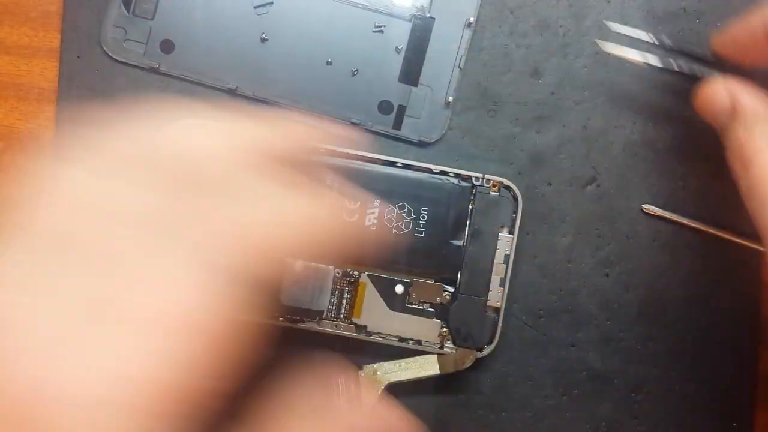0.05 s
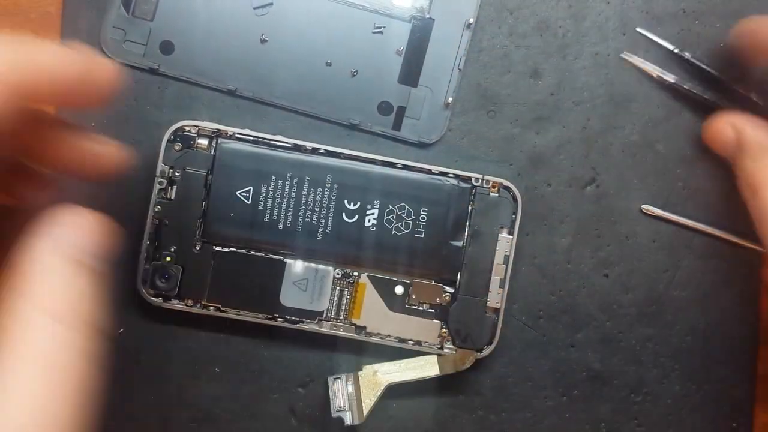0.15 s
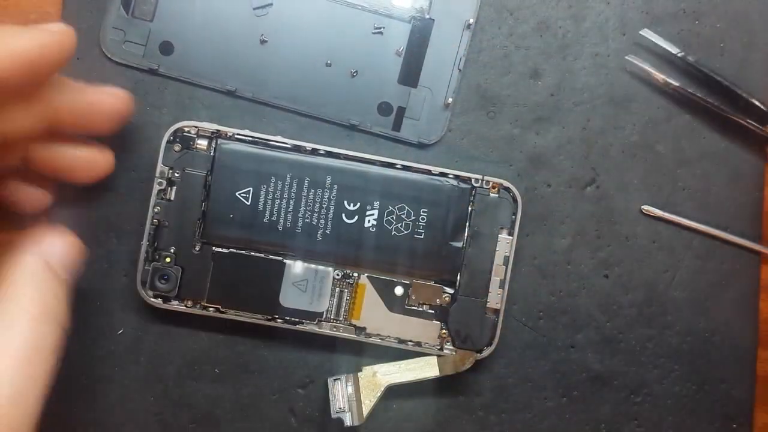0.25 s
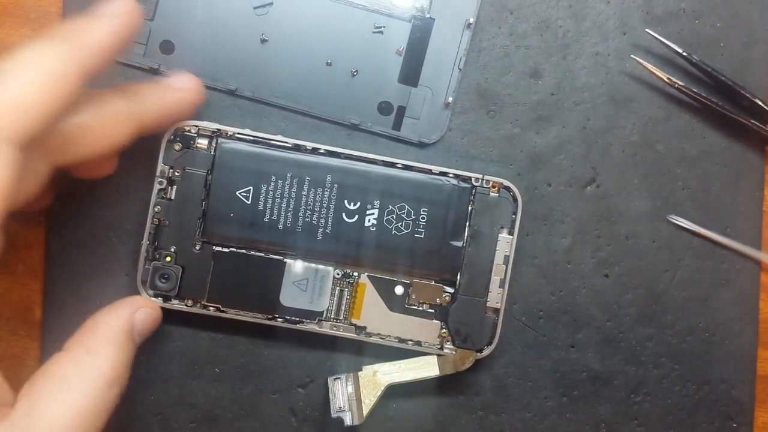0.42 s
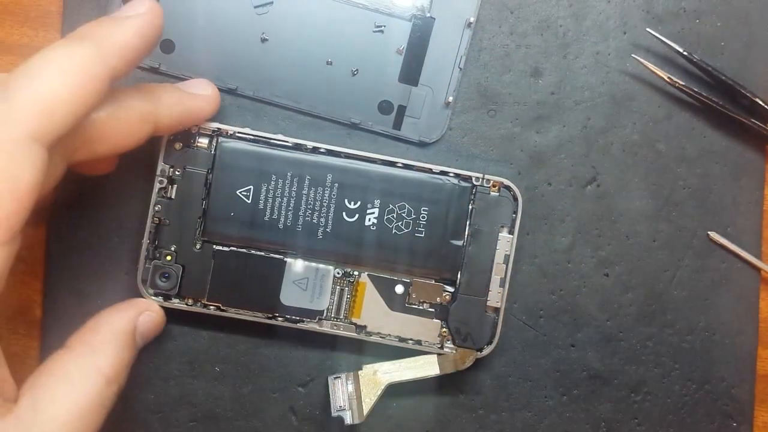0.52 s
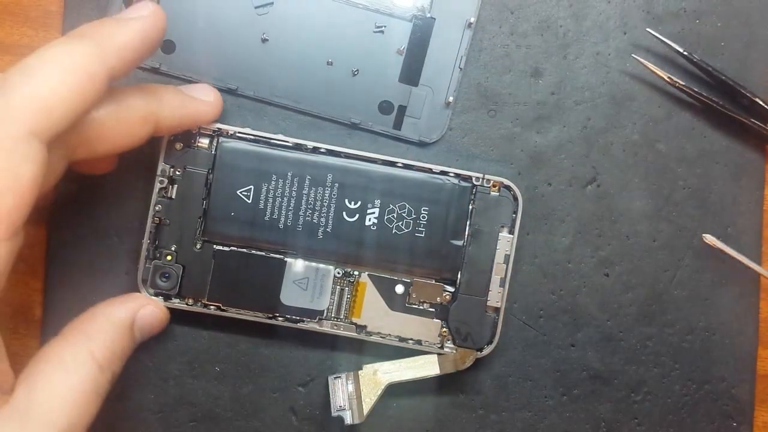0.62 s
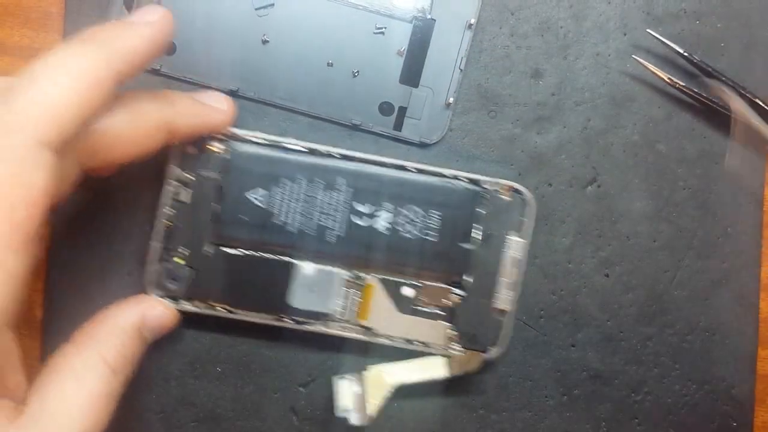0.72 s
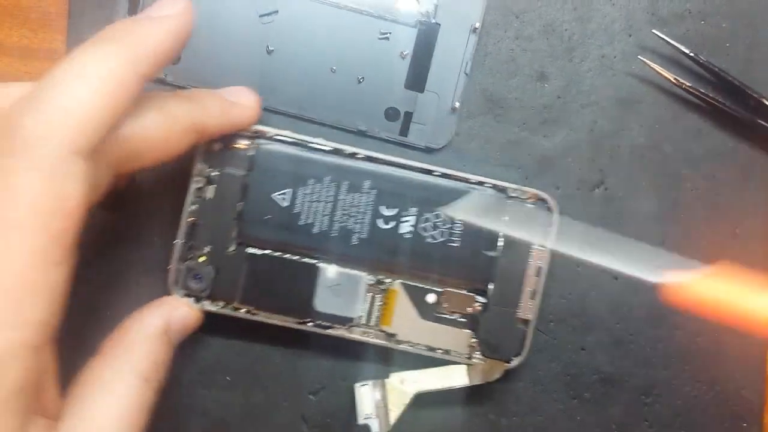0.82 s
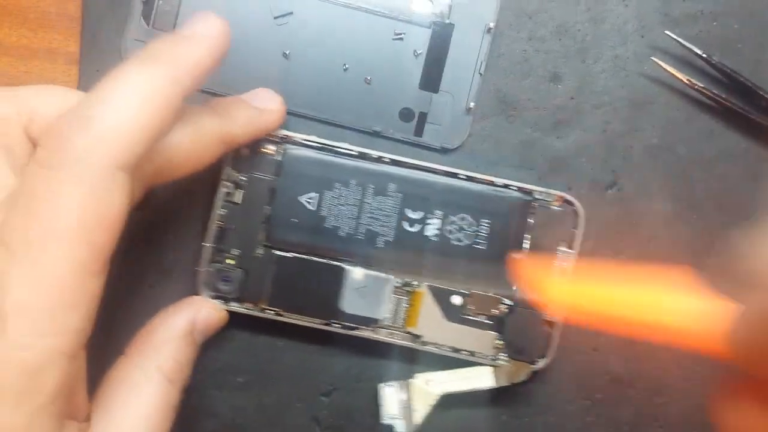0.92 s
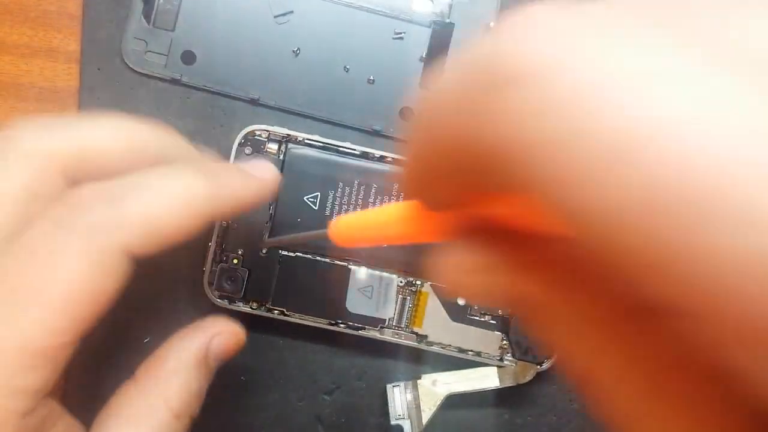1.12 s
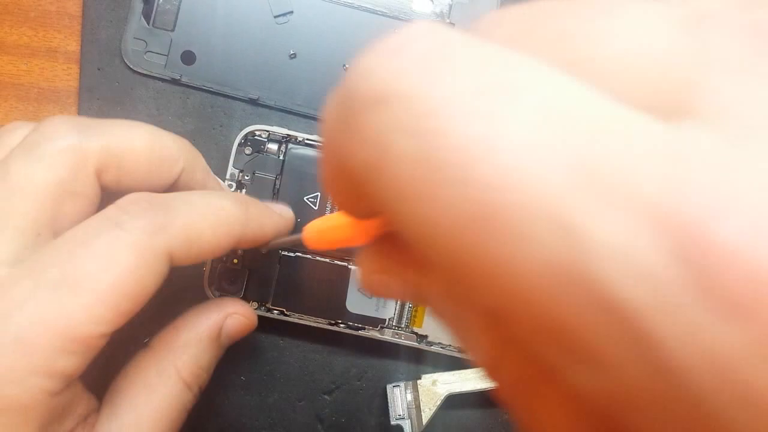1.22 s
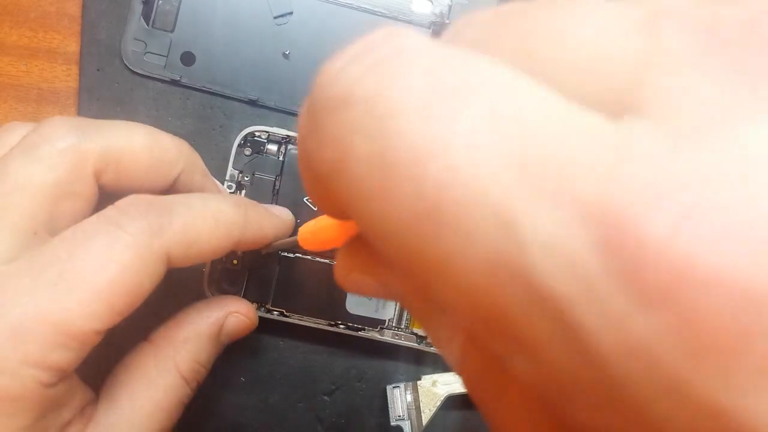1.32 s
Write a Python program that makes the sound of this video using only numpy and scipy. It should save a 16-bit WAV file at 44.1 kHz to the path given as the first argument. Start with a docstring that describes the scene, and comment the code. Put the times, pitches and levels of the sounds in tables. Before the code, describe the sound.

Bright, loud clink of steel tweezers landing on a bench, rattling in ever faster bounces, then soft rustling

```python
"""Steel tweezers drop onto a workbench mat, close to a two-port recorder, and bounce to rest.
Each contact is a set of short modes plus a noise crack; two long leg modes ring between bounces.
A hand moves softly on the bench before, during and after the drop, as swells of noise; a nail
ticks twice on a tool after it, as short modes. Room noise and hum lie underneath, decaying noise
gives the echoes of bench and walls, and the loud clink makes the recorder turn its gain down."""
import sys
import numpy as np
from scipy import signal
from scipy.fft import rfft, irfft
from scipy.io import wavfile

SR = 44100
rng = np.random.default_rng(int(sys.argv[2]) if len(sys.argv) > 2 else 0)


def store_wav(level_fs):
    """Save 16-bit WAV to argv[1]."""
    pcm = np.round(np.clip(np.atleast_2d(level_fs), -1, 1) * 32767)
    wavfile.write(sys.argv[1], SR, pcm.T.astype(np.int16))


N = 59535

# Tweezers meeting the mat; each ring strength holds from its bounce to the next:
# start_s, knock_db, treble_db (on top of the knock), low_ring_db, high_ring_db
BOUNCES = [(0.2465, 8, 3, -40, -12.5), (0.279, -16, 0, -17, -18.5), (0.3219, 2.5, 2.5, -5, -27.5),
           (0.379, 0.5, 1, -22, -24.5), (0.4323, -1.5, -1, -10, -28), (0.4734, -4, 1.5, -12.5, -40.5),
           (0.5061, -8.5, 6, -14, -36), (0.525, -15, 9.5, -16.5, -34), (0.538, -15.5, 1, -18.5, -36),
           (0.547, -23, 7, -18, -37), (0.553, -18, -2, -22.5, -35.5), (0.572, -22.5, 6.5, -22, -38.5),
           (0.598, -33.5, 3.5, -28, -44)]
# Nail on tool: start_s, level_db, treble_db (on top of the level)
TICKS = [(0.799, -14, 0), (.8462, -27, -9)]
TREBLE_HZ = 5200  # the treble_db columns act above this


def amp(db):
    """Decibels to amplitude."""
    return 10 ** (np.asarray(db, float) / 20)


def rms_one(x):
    """Scale to an RMS of 1."""
    return x / np.sqrt(np.mean(x ** 2) + 1e-20)


def at_hz(points, hz):
    """Read a curve of (Hz, value) points, straight over log frequency."""
    points = np.array(points)
    return np.interp(np.log(hz), np.log(points[:, 0]), points[:, 1])


def smooth(x, seconds):
    """One-pole lag."""
    r = np.exp(-1 / (max(seconds, 1e-4) * SR))
    return signal.lfilter([1 - r], [1, -r], x)


def drift(seconds):
    """Slow random wander with an RMS of 1."""
    noise = rng.standard_normal(N + SR)  # the first second lets the lags settle
    return rms_one(smooth(smooth(noise, seconds), seconds)[SR:])


def clicks(s, gain):
    """Single-sample clicks at the given seconds."""
    out = np.zeros(N)
    out[(np.asarray(s) * SR).astype(int)] = gain
    return out + 1e-18


def ring(x, hz, t60):
    """A unit click sets a decaying sine ringing, of height 1 at its start."""
    r, w = amp(-60 / (t60 * SR)), 2 * np.pi * hz / SR
    return signal.lfilter([0, np.sin(w)], [1, -2 * r * np.cos(w), r * r], x)


def coloured(x, spectrum):
    """Weight a sound by a spectrum of (Hz, dB) points."""
    hz = np.maximum(np.fft.rfftfreq(N, 1 / SR), 1)
    return irfft(rfft(x) * amp(at_hz(spectrum, hz)), N)


def cut(x, hz, kind):
    """Second-order Butterworth filter."""
    return signal.sosfilt(signal.butter(2, hz, kind, fs=SR, output="sos"), x)


def pair(alike):
    """Two white noises sharing the given part of their power."""
    both, *own = rng.standard_normal((3, N))
    alike = np.clip(alike, 0, 1)
    return np.sqrt(alike) * both + np.sqrt(1 - alike) * np.array(own)


def room_noise():
    """Broad hiss and rumble from the left, most alike at both ports in the bass, plus wavering hum tones."""
    # Broad noise density: hz, level_db (shape only)
    noise_spectrum = [(15, -56.5), (35, -23), (86, -9), (143, -6), (214, -15), (259, -9), (520, -16),
                      (890, -12), (1330, -16), (5990, -26), (12400, -50), (15300, -66.5)]
    # Hum held by the room, as noise-driven resonances: hz, width_hz (t60 = 1.8 / width), level_db
    hum_tones = [(104, 20, -53), (133.7, 20, -43.5), (255.7, 16, -50), (281.6, 8.6, -54)]
    # Likeness of the two ports: hz, correlation
    likeness = [(30, .8), (70, 1), (250, 1), (600, .6), (1600, 0.36), (5000, 0.17), (14000, 0.074)]
    noise_db, pan_db, left_leads_s = -36.5, 2.5, 0.00028
    alike = [(hz, np.clip(c, 0, 0.99)) for hz, c in likeness]
    mid, side = rng.standard_normal((2, N))
    mid = coloured(mid, [(hz, 10 * np.log10(1 + c)) for hz, c in alike])
    side = coloured(side, [(hz, 10 * np.log10(1 - c)) for hz, c in alike])
    broad = rms_one(np.array([coloured(x, noise_spectrum) for x in (mid + side, mid - side)]))
    hum = 0
    for hz, width, level_db in hum_tones:
        tone = ring(rng.standard_normal(N + SR), hz, 1.8 / width)[SR:]
        hum = hum + amp(level_db) * rms_one(tone)
    left, right = amp(noise_db) * broad + cut(hum, 49, "high")
    right = np.roll(right, round(left_leads_s * SR))
    return np.array([left * amp(pan_db / 2), right * amp(-pan_db / 2)])


def swells(rows, low_hz, high_hz, alike):
    """Soft bell-shaped swells of noise in one band."""
    t = np.arange(N) / SR
    swell = sum(amp(db) * np.exp(-((t - s) / half) ** 2) for s, half, db in rows)
    return swell * rms_one(cut(pair(alike), [low_hz, high_hz], "band"))


def hand():
    """A hand moving on the bench: low rumbles nearly alike at both ports, and high rustles mostly not."""
    # Rumbles: peak_s, half_width_s (to 1/e), level_db
    rumbles = [(.15, 0.076, -45), (.275, 0.036, -30.5), (1.267, 0.0083, -34.5), (1.32, 0.082, -35)]
    # Rustles: peak_s, half_width_s (to 1/e), level_db
    rustles = [(.215, 0.005, -47), (0.866, 0.068, -49.5), (0.98, 0.038, -46.5), (1.30, 0.054, -52)]
    low = swells(rumbles, 89.5, 463, alike=0.8)
    high = swells(rustles, 3493, 8700, alike=0.17)
    return low + high


def knock_modes():
    """Short modes of tweezers and bench, swelling then dying; bending waves bring many low ones later."""
    # Modes: hz, level_db (relative), strongest_after_s, t60_s
    modes = [(3397, 3.5, 0.000068, 0.0025), (885, -13.5, 0.00082, 0.009), (513, -23.5, 0.0031, 0.0072),
             (716, -23.5, 0.0046, 0.004), (1117, -18, 0.005, 0.014), (1402, -19, 0.0057, .007),
             (1700, -28.5, 0.0016, 0.0043), (1997, -20.5, 0.003, 0.0063), (2306, -5.5, 0.0033, 0.016),
             (2399, -9.5, 0.0037, 0.015), (3295, -5, 0.00089, 0.012), (3523, -4, 0.0021, .012),
             (4104, -6, 0.0016, 0.012), (4915, -6, 0.0017, 0.025), (5946, -10, 0.0016, 0.034),
             (6333, -11, 0.00051, 0.031), (7780, -14.5, 0.00039, .003)]
    modes_db, strike_spread_db = -2, 0.9
    right_leads_s = 0.00013
    air_from_hz = 2800  # lower modes come through the bench and reach both ports together
    s, db, treble_db = np.transpose(BOUNCES)[:3]
    spread_db = rng.normal(0, strike_spread_db, (len(s), len(modes)))  # no two blows excite them alike
    t = np.arange(SR // 10) / SR
    out = 0
    for k, (hz, level_db, late, t60) in enumerate(modes):
        left_delay = right_leads_s * (hz > air_from_hz)
        since = np.maximum(t - np.array([[left_delay], [0]]), 0)
        rise = np.sin(np.pi / 2 * np.minimum(since / late, 1)) ** 2
        fall = amp(-60 * np.maximum(since - late, 0) / t60)
        mode = -rise * fall * np.sin(2 * np.pi * hz * since)
        strikes = clicks(s, amp(db + spread_db[:, k] + treble_db * (hz > TREBLE_HZ)))
        out = out + amp(modes_db + level_db) * signal.fftconvolve(strikes[None], mode, axes=1)[:, :N]
    return out


def crack(blows, blows_treble):
    """Loose parts shiver: every blow starts a burst of noise that dies exponentially."""
    # Crack noise density: hz, level_db (shape only)
    crack_spectrum = [(200, -26.5), (700, -6.5), (1500, -2), (2880, -4.5), (3930, 2.5), (6180, -5),
                      (7970, -12), (8890, -14), (12000, -41), (15300, -34)]
    crack_db, t60 = -7.5, 0.039
    noise = amp(crack_db) * rms_one(coloured(pair(alike=0.53), crack_spectrum))
    fall = [1, -amp(-60 / (t60 * SR))]
    low = cut(noise, TREBLE_HZ, "low") * signal.lfilter([1], fall, blows)
    high = cut(noise, TREBLE_HZ, "high") * signal.lfilter([1], fall, blows_treble)
    return low - high


def knocks():
    """Every contact excites short modes and a crack, brighter or duller; the legs clap after the first."""
    # Legs clapping together: start_s, peak_db, hz, t60_s
    leg_claps = [(.2650, 0.5, 4320, 0.011), (0.2706, -9, 4490, 0.064), (0.273, -3.5, 4340, 0.045)]
    s, db, treble_db = np.transpose(BOUNCES)[:3]
    blows, blows_treble = clicks(s, amp(db)), clicks(s, amp(db + treble_db))
    claps = sum(ring(clicks([at], amp(peak_db)), hz, t60) for at, peak_db, hz, t60 in leg_claps)
    tonal = cut(knock_modes() + claps, 9000, "low")
    return cut(crack(blows, blows_treble) + tonal, 310, "high"), blows


def legs():
    """Two long modes; every bounce damps them and sets them going again at a new strength."""
    low_hz, high_hz = 4376, 8844
    rest_s, rest_rise_hz_per_s, muted_s = 0.563, 800, 0.645  # lying down stiffens the leg, the mat mutes it
    rest_fade_db_per_s = 297.5  # of the low mode, once at rest
    rise_s, loss_db_per_s, waver_db = 0.0076, 37, 1.8
    full_stop_db = -10  # knocks this strong stop the ring fully
    low_pan_db, low_leads, high_pan_db, high_leads = 6.5, -0.35, 3.5, -1.8  # left over right: dB, radians
    t, table = np.arange(N) / SR, np.array(BOUNCES)
    last = np.maximum(np.searchsorted(table[:, 0], t) - 1, 0)
    since = np.maximum(t - table[last, 0], 0)
    rested = np.maximum(t - rest_s, 0)
    stop = np.minimum(amp(table[last, 1] - full_stop_db), 1)
    shape = (1 - stop * np.exp(-(since / rise_s) ** 2)) * amp(-loss_db_per_s * since)
    shape = shape * (t > table[0, 0]) * (t < muted_s)
    low_db = table[last, 3] - rest_fade_db_per_s * rested + waver_db * drift(0.0013)
    high_db = table[last, 4] + waver_db * drift(0.025)
    low_phase = 2 * np.pi * np.cumsum(low_hz + rest_rise_hz_per_s * rested) / SR
    high_phase = 2 * np.pi * high_hz * t
    sides = np.array([[0.5], [-0.5]])
    low = smooth(shape * amp(low_db), 0.001) * np.sin(low_phase + low_leads * sides)
    high = smooth(shape * amp(high_db), 0.001) * np.sin(high_phase + high_leads * sides)
    return amp(low_pan_db * sides) * low + amp(high_pan_db * sides) * high


def sent_to_room(knock, blows):
    """What knocks and ticks radiate into the room: coloured clicks plus some of the knock itself."""
    # Radiation of a knock: hz, level_db (relative)
    radiated = [(250, -34), (700, -19), (1500, -16.5), (2400, -10.5), (3200, -20.5), (4200, -13),
                (6200, -17.5), (8000, -19.5), (12000, -40.5)]
    radiated_db, knock_db, tick_db = 34.5, -9, 19.5
    s, db, treble_db = np.transpose(TICKS)
    tick = cut(clicks(s, amp(db + treble_db)), [4640, 6240], "band")
    return amp(radiated_db) * coloured(blows, radiated) + amp(knock_db) * knock + amp(tick_db) * tick


def room(x):
    """Dense echoes from bench and walls: octave bands of noise, each dying at its own rate."""
    # Decay of the room: hz, t60_s
    decay = [(300, 0.47), (1500, 0.21), (4000, 0.23), (6000, 0.28), (11000, 0.05)]
    build_up_s = 0.0035
    t = np.arange(SR // 2) / SR
    white = rng.standard_normal((2, len(t)))
    tail = 0
    for low in 250 * 2.0 ** np.arange(6):
        fall = amp(-60 * t / at_hz(decay, 1.08 * low))  # read just above the band's lower edge
        tail = tail + cut(white, [low, 2 * low], "band") * fall
    tail = cut(tail, 7950, "low") * (1 - np.exp(-t / build_up_s))
    tail = tail / np.sqrt(np.sum(tail ** 2) / 2)
    return signal.fftconvolve(x, tail, axes=1)[:, :N]


def ticks():
    """A nail ticks on a tool, whose few short modes beat."""
    # Modes of the tool: hz, level_db (relative), t60_s
    tool_modes = [(3780, -7, 0.0039), (5470, 0, 0.014), (6340, -0.5, 0.02), (11560, -8, 0.0007)]
    s, db, treble_db = np.transpose(TICKS)
    out = 0
    for k, (hz, level_db, t60) in enumerate(tool_modes):
        strikes = clicks(s, amp(db + treble_db * (hz > TREBLE_HZ)))
        out = out + (-1) ** k * amp(level_db) * ring(strikes, hz, t60)
    return out


def scene():
    """Near sounds with their echoes, balanced between the ports, then legs, hand and room noise."""
    # Near sounds, left over right: hz, balance_db
    balance = [(200, -3), (700, 1.3), (1500, 1), (2500, 7), (3800, 11.5), (6000, 6), (9000, -3),
               (14000, -11.5)]
    echo_db = -5.5
    knock, blows = knocks()
    near = knock + ticks() + amp(echo_db) * room(sent_to_room(knock, blows))
    left = coloured(near[0], [(hz, db / 2) for hz, db in balance])
    right = coloured(near[1], [(hz, -db / 2) for hz, db in balance])
    return np.array([left, right]) + legs() + hand() + room_noise()


def record(dry):
    """Gain control looks ahead, cuts in a quick and a slow stage and hardly lets go; peaks are rounded."""
    # Gain stages: deepest_cut_db, attack_s
    stages = [(6, 0.011), (15, 0.23)]
    from_db, look_ahead_s, ceiling = -8, 0.027, 0.8
    share_per_db, back_share_per_s = 0.34, 0.3  # shares of the deepest cut
    t = np.arange(N) / SR
    level_db = 10 * np.log10(smooth(np.mean(dry ** 2, axis=0), 0.0016) + 1e-12)
    over = np.clip(share_per_db * (level_db - from_db), 0, 1)
    back = back_share_per_s * t
    held = np.maximum.accumulate(over + back) - back  # peak hold with a slow straight release
    held = np.interp(t + look_ahead_s, t, held)
    cut_db = sum(depth_db * smooth(held, attack) for depth_db, attack in stages)
    turned_down = dry * amp(-cut_db)
    rounded = turned_down / (1 + (turned_down / ceiling) ** 4) ** 0.25
    return signal.sosfilt(signal.cheby2(12, 70, 15480, fs=SR, output="sos"), rounded)  # steep top cut


dry = scene()
out = record(dry)
store_wav(out)
```